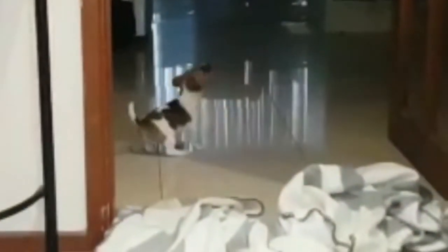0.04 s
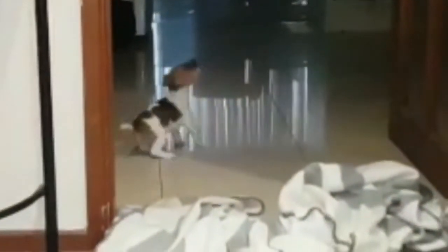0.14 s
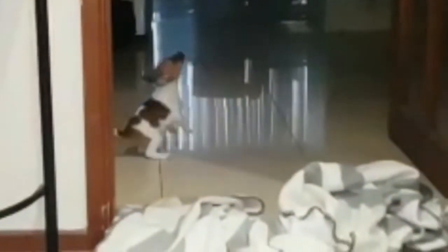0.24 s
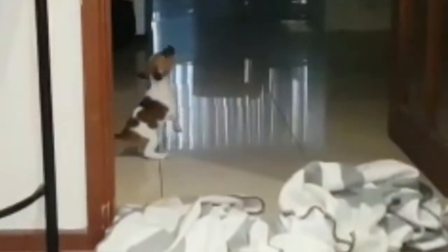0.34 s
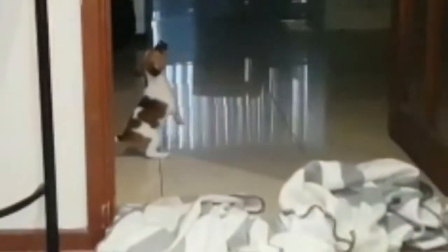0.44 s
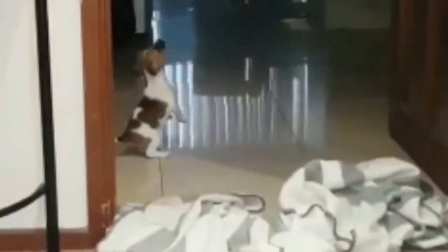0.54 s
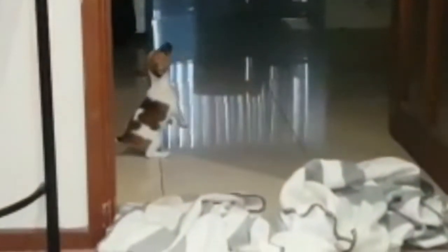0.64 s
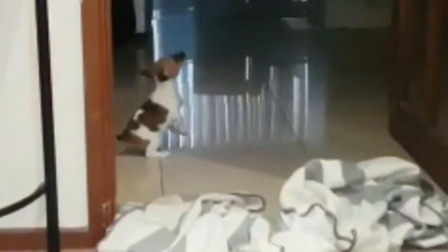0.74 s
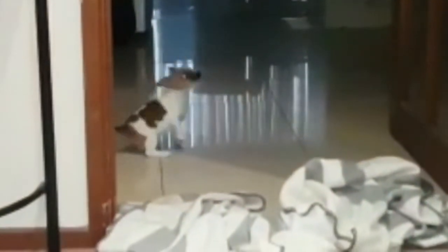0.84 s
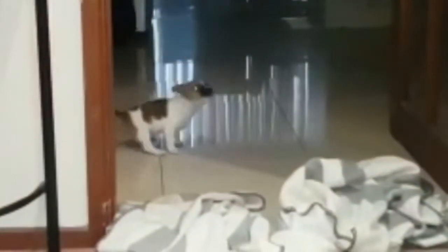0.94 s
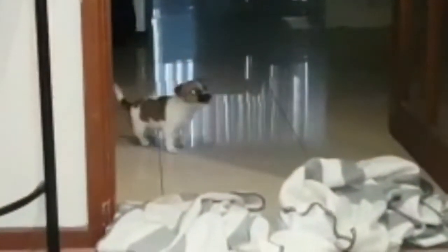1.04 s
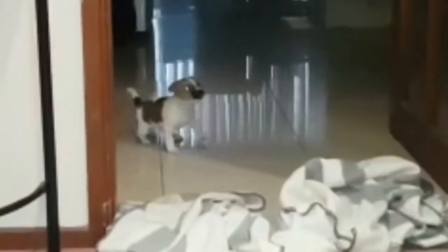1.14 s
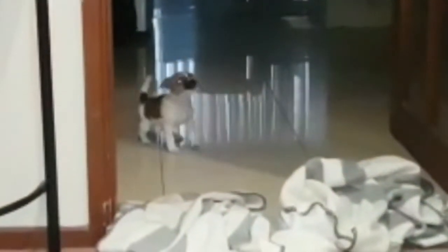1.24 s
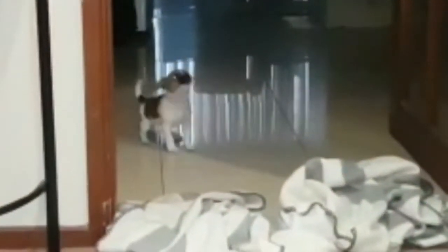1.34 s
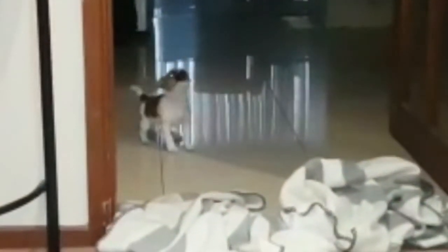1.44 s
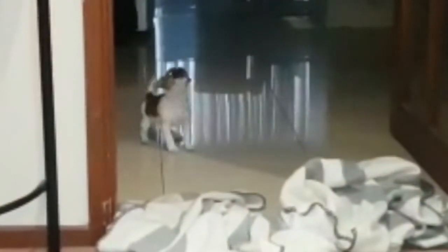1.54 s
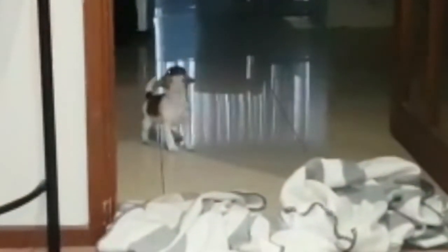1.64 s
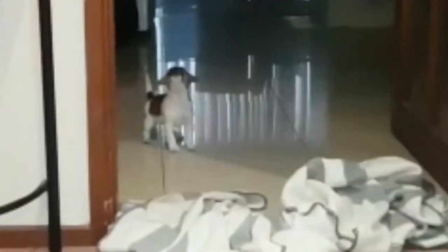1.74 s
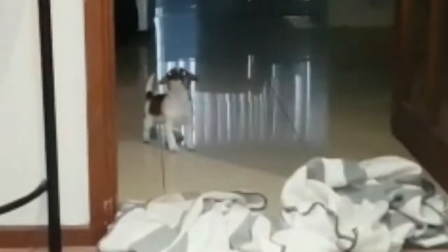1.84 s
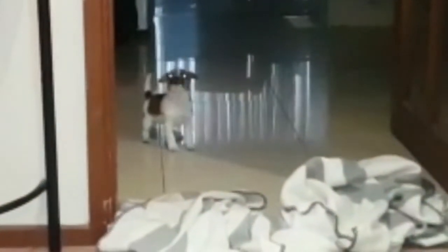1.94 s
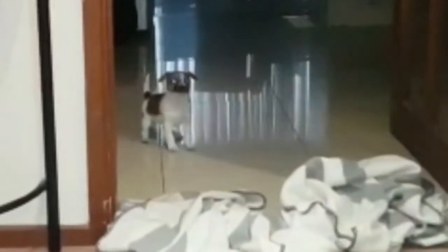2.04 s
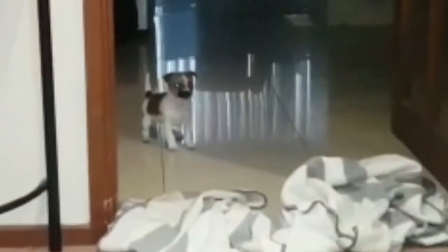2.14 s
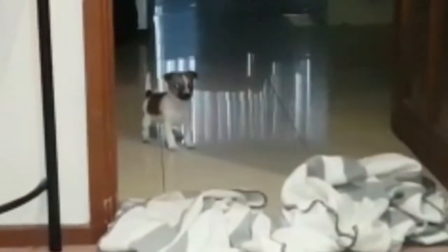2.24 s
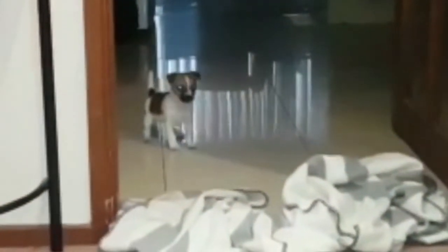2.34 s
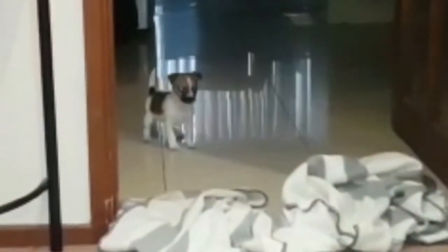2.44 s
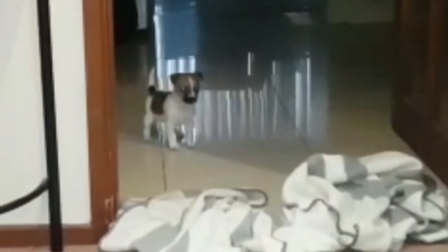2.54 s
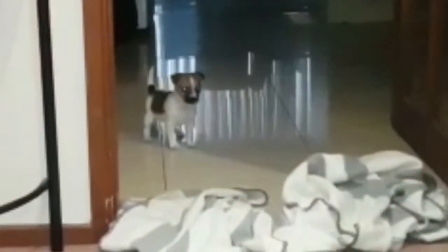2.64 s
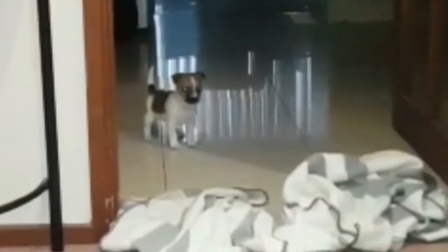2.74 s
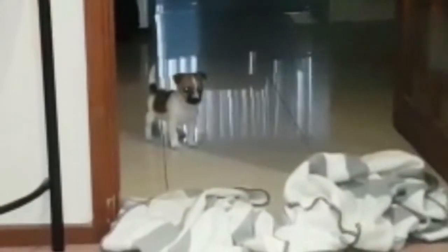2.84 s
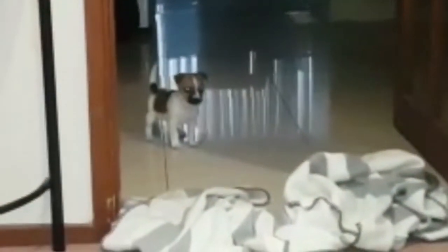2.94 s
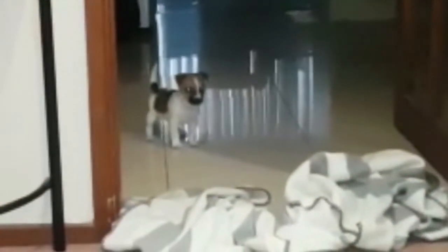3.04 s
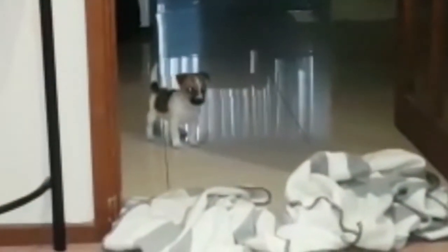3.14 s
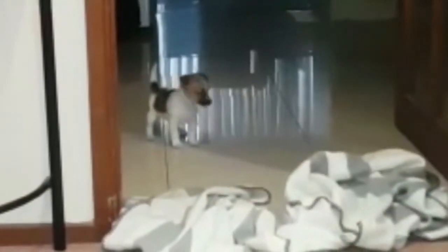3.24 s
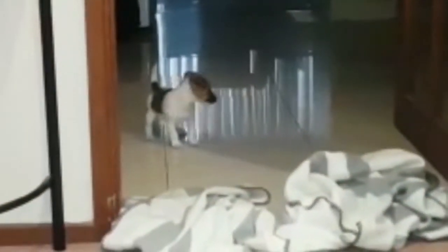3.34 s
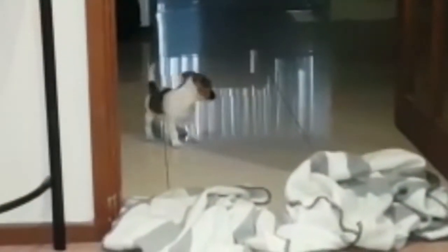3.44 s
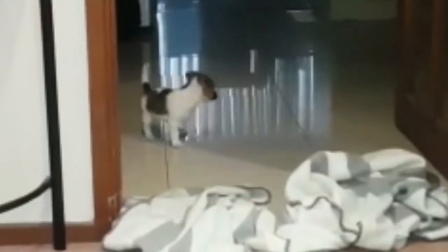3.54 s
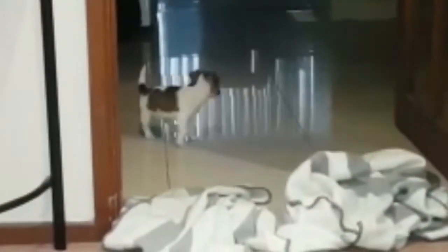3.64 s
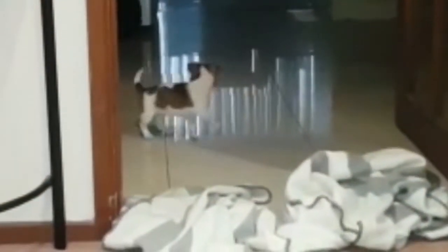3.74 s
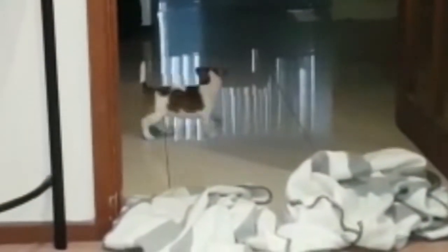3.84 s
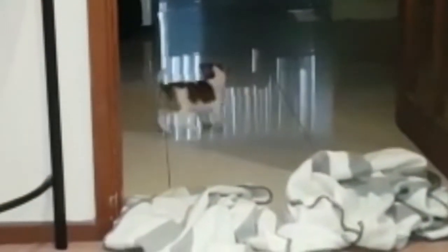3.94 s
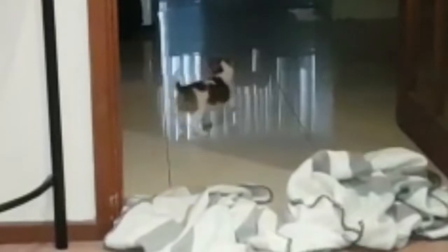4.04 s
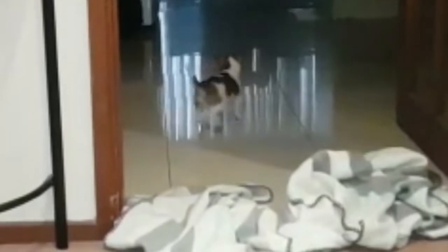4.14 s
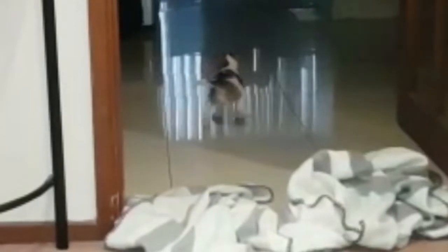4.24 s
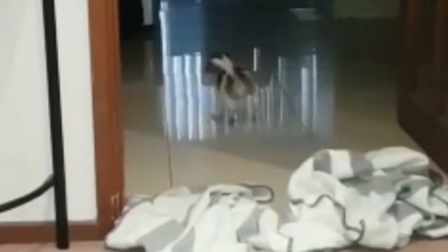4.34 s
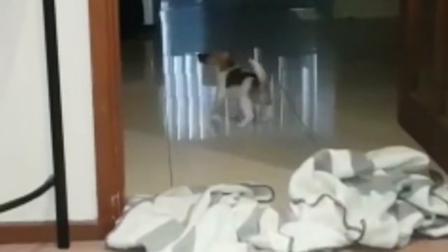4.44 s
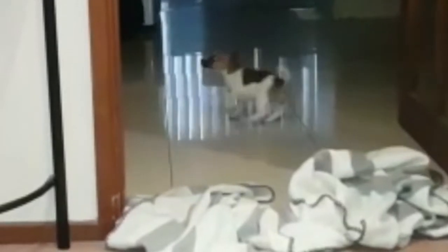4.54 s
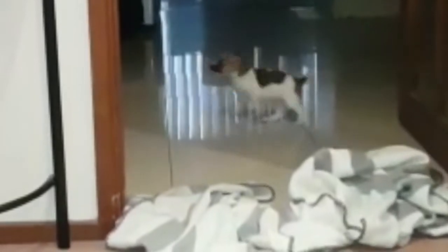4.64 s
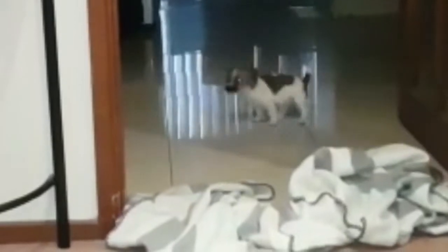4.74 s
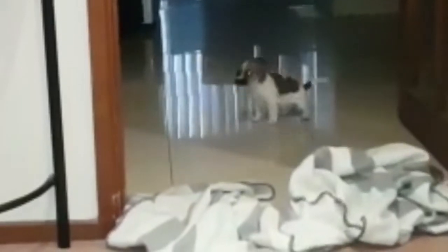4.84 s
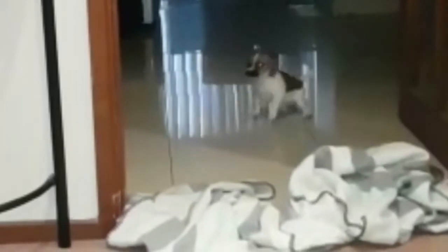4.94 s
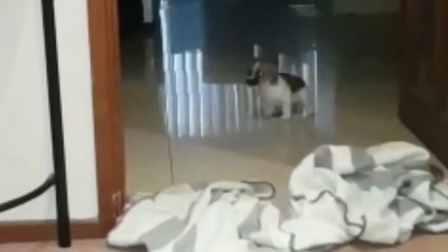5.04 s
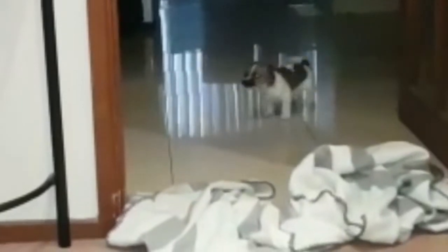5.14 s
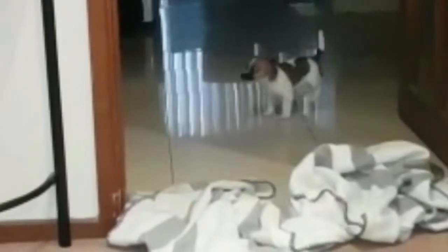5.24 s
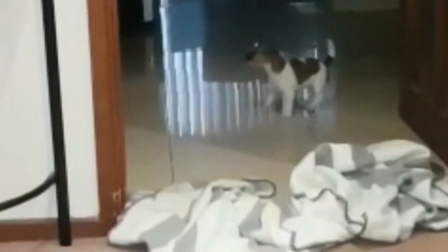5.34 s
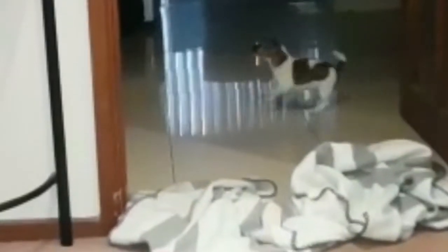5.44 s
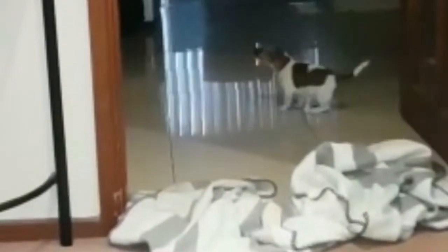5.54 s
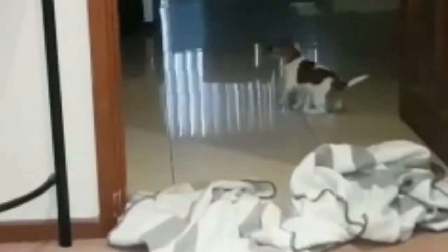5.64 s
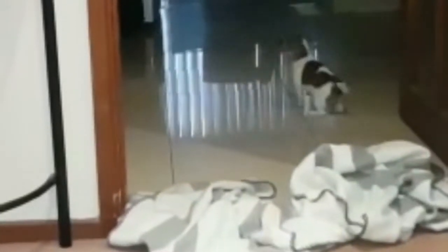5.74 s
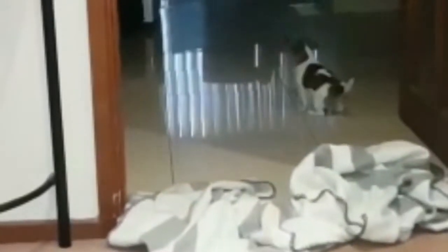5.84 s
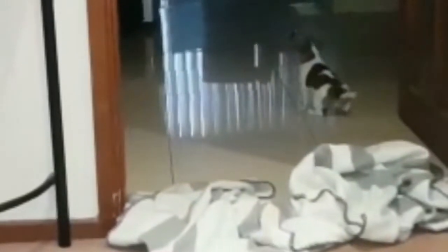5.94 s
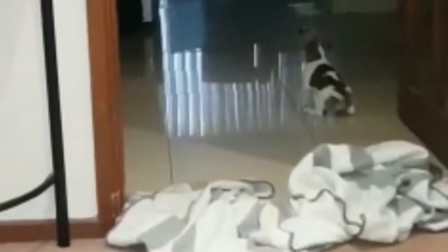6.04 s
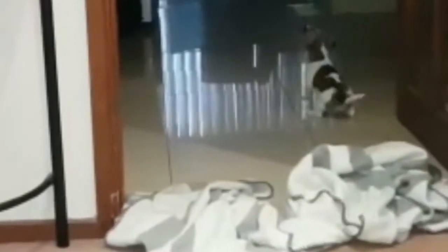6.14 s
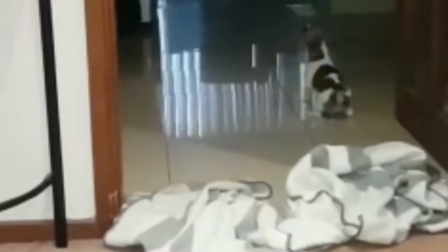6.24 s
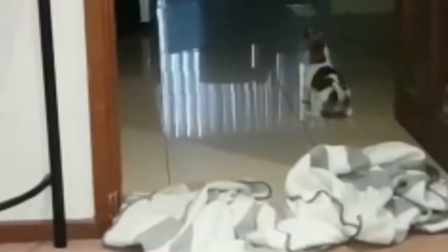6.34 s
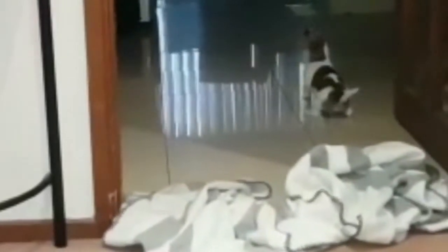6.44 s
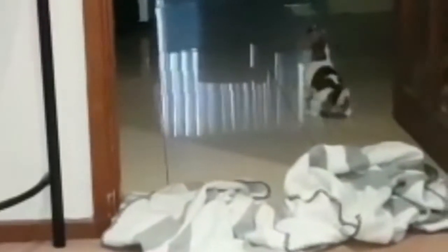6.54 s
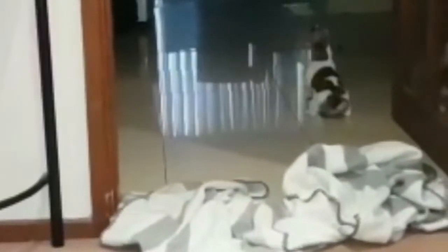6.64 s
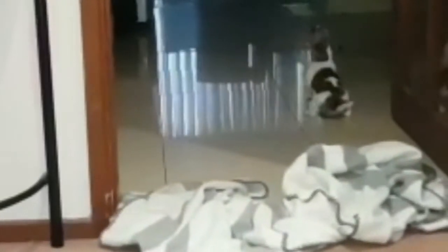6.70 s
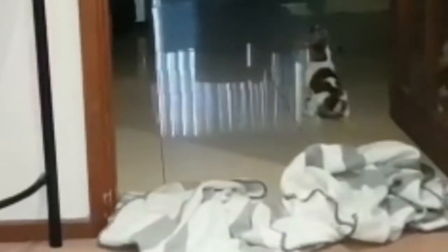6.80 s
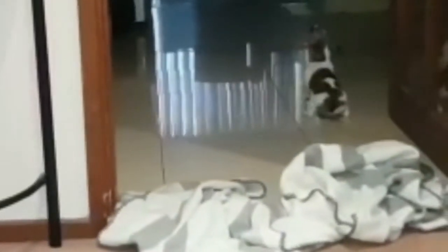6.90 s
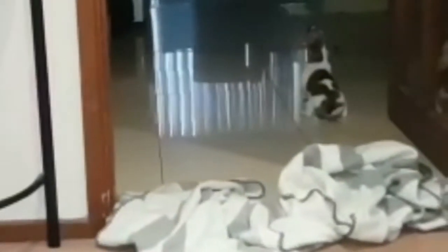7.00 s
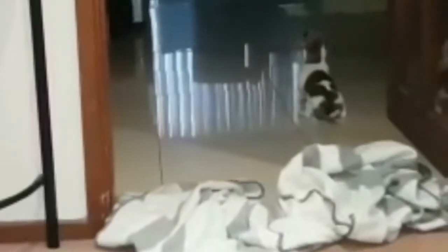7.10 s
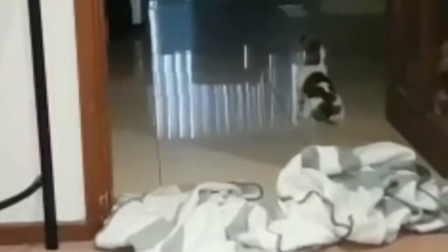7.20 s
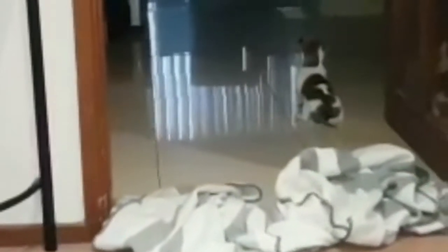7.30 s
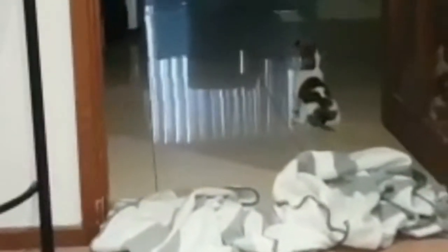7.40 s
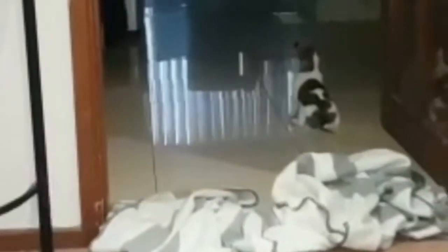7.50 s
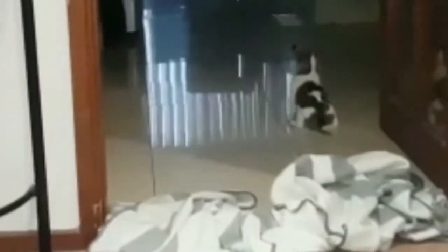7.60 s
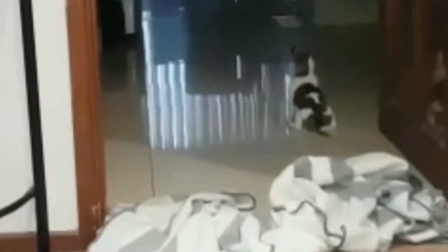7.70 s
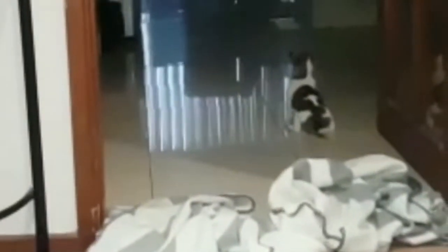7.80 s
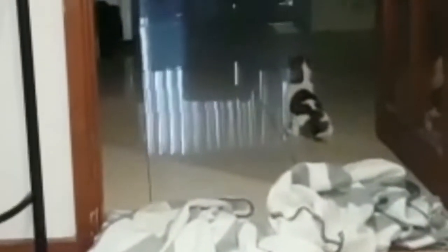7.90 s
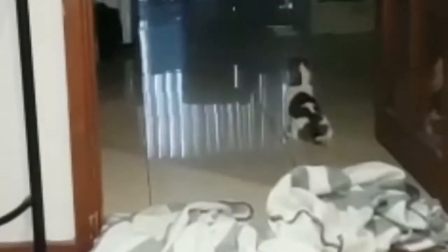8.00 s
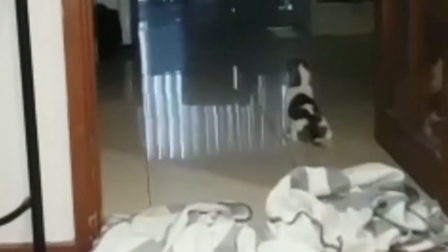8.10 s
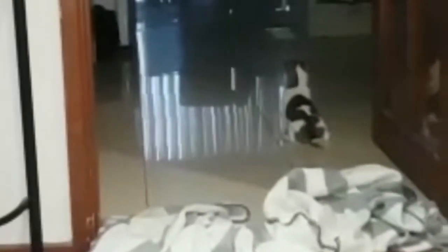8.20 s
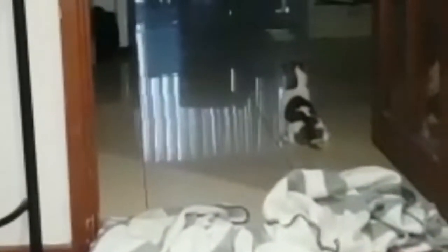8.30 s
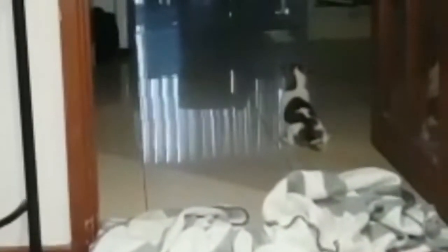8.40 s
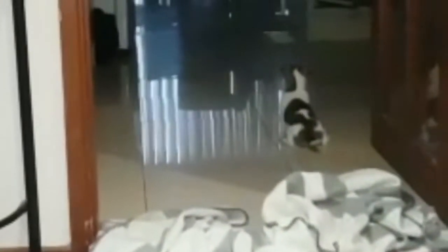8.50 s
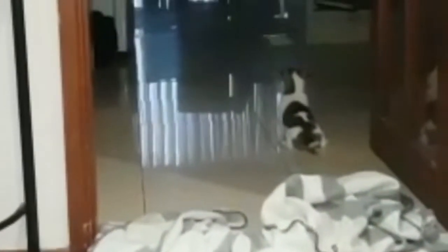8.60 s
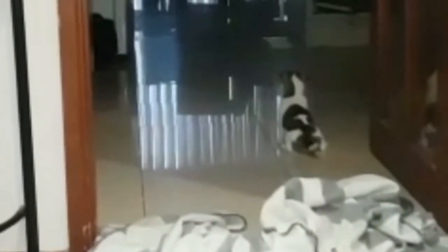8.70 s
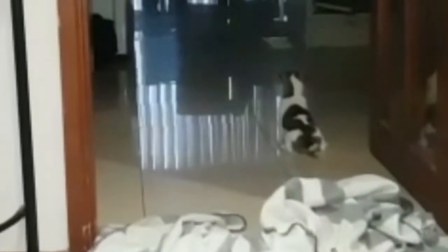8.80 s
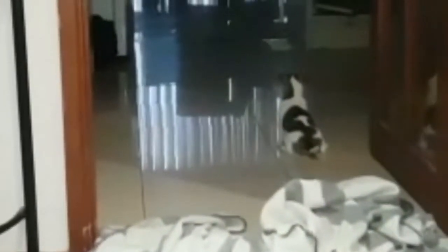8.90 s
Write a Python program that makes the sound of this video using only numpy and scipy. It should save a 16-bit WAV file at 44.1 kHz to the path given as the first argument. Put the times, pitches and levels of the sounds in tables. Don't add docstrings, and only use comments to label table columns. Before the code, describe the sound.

In a hard tiled hallway, a phone a few metres away picks up a small puppy over low unsteady machine hum, faint distant room murmur and microphone hiss. At 0 s a long, piercing, almost pure whine near 1.3 kHz jumps up, then sinks until 0.7, followed by a tiny grunt and low whimper. Soft paw pats near 1.0 lead into a second arched cry until 1.7. A faint level whimper follows at 1.9, then mostly hum until 3.3. A thin rising whimper at 3.4 starts a string of short falling whines from 3.8 to 5.8, with a claw tick at 5.55. At 5.9 a loud cry breaks into rasp, answered at 6.4 to 7.0. Softer wavering and sinking whimpers come at 7.2 and 7.8, with breathy gasps and thin nose whistles, then hum until a high peep at 8.8, cut off at the end.

```python
import sys
import numpy as np
from scipy import signal
from scipy.fft import rfft, irfft, next_fast_len
from scipy.io import wavfile
from scipy.ndimage import map_coordinates

SR = 44100
rng = np.random.default_rng(int(sys.argv[2]) if len(sys.argv) > 2 else 0)


def boost(x):
    u = np.asarray(x, float) / 20
    return 10 ** u


def int16_out(signal):
    q = np.round(np.clip(np.atleast_2d(signal).T, -1, 1) * 32767)
    wavfile.write(sys.argv[1], SR, q.astype(np.int16))


N = 395136
STEP = 16

# t/s, pitch f/Hz, level/dB
LONG_CRIES = [
    [(0.0, 1269, -29.5), (0.056, 1265, -40.5), (0.154, 1295, -17), (0.19, 1478, -14.5),
     (0.242, 1309, -17.5), (0.318, 1293, -10.5), (0.442, 1203, -22), (0.57, 1113, -21), (0.7, 1070, -50.5)],
    [(1.03, 1056, -44.5), (1.062, 1104, -30.5), (1.12, 1034, -31.5), (1.168, 1070, -21), (1.23, 1225, -26),
     (1.3, 1223, -15), (1.508, 1089, -15), (1.6, 1034, -22), (1.7, 1007, -48)],
    [(5.88, 1263, -25), (5.9, 1303, -18), (5.97, 1332, -23), (6.036, 1320, -14.5), (6.094, 1230, -32),
     (6.128, 1279, -17), (6.168, 1193, -21.5), (6.25, 1129, -39.5)],
    [(6.37, 1043, -34.5), (6.422, 1162, -33), (6.528, 1093, -26), (6.552, 1159, -35.5), (6.6, 1341, -18),
     (6.7, 1267, -22.5), (6.846, 1173, -25.5), (6.89, 1114, -23.5), (6.98, 1080, -41.5)],
]
# t/s, pitch f/Hz, level/dB
WHIMPERS = [
    [(0.79, 984.6, -53), (0.804, 953.6, -34.5), (0.846, 1052, -27.5), (0.92, 1041, -38.5), (0.95, 977, -32)],
    [(1.9, 958.2, -61.5), (1.91, 984.7, -39.5), (1.966, 1127, -36.5), (2.08, 1146, -34.5),
     (2.144, 1093, -30.5), (2.18, 1086, -49)],
    [(3.37, 1547, -81), (3.384, 1561, -43), (3.456, 1597, -31.5), (3.53, 1679, -31.5), (3.57, 1719, -32),
     (3.66, 1735, -60)],
    [(7.16, 1151, -47), (7.18, 1080, -34.5), (7.222, 1180, -37), (7.286, 1156, -28.5), (7.378, 1025, -30.5),
     (7.464, 1113, -29), (7.5, 1122, -42.5)],
    [(7.75, 1080, -39.5), (7.796, 1174, -37.5), (7.886, 1075, -30), (7.94, 1005, -49.5), (8.0, 854, -47)],
    [(8.78, 1565, -33), (8.798, 1471, -30.5), (8.88, 1640, -37.5), (8.918, 1486, -19), (8.96, 1480, -25)],
]
# t/s, pitch f/Hz, level/dB
FALLING_WHIMPERS = [
    [(3.8, 1486, -39.5), (3.83, 1591, -38), (3.9, 1518, -27.5), (3.97, 1475, -25), (4.02, 1325, -32.5),
     (4.045, 1179, -55.5)],
    [(4.195, 1622, -41), (4.23, 1584, -28.5), (4.29, 1539, -23), (4.33, 1450, -28), (4.38, 1288, -29.5),
     (4.41, 1178, -40.5)],
    [(4.57, 1750, -56), (4.595, 1881, -33), (4.615, 1620, -32), (4.75, 1340, -27), (4.775, 1182, -34.5),
     (4.8, 991, -47)],
    [(4.935, 1759, -43.5), (4.955, 1612, -28.5), (4.99, 1606, -31), (5.07, 1407, -28), (5.11, 1210, -34.5),
     (5.15, 1117, -33.5), (5.19, 1000, -53.5)],
    [(5.28, 1262, -47), (5.326, 1494, -28), (5.396, 1422, -32), (5.448, 1145, -30.5), (5.538, 1123, -34),
     (5.62, 1108, -100)],
    [(5.67, 1469, -43), (5.738, 1532, -33.5), (5.8, 1231, -36.5), (5.822, 1171, -36.5), (5.875, 1211, -29)],
]
# t/s fully open, stay/s, lift level/dB
MOUTH_OPENINGS = [
    (.44, .3, 19),
    (0.799, .07, 16.5),
    (1.249, .5, 13.5),
    (4.3, .15, -9),
    (6.14, .15, 15),
    (6.86, .2, 16.5),
]
# f/Hz, level/dB
OCTAVE_LEVEL = [(2000, -28), (2300, -22.5), (2600, -24), (2900, -34), (3300, -32.5)]
# f/Hz, level/dB
THROAT_RESPONSE = [(2600, -16), (3300, -22), (3900, -13), (4500, -3), (5050, -4), (5350, -12), (5750, -30),
                   (6300, -38), (7400, -31), (8300, -26), (9500, -30), (11800, -13), (15000, -17)]
# f/Hz, level/dB
OPEN_MOUTH_GAIN = [(3300, -6.5), (3900, -9.5), (4500, -10.5), (5200, -5), (5700, 18.5), (6200, 19.5),
                   (7000, 4.5), (8000, 11), (9500, 5.5), (11500, -3), (14000, -18.5)]
# from t/s, upper partials' level/dB at first, level/dB warm, warm-up/s,
# extra level/dB of the top partials
THROAT_BRIGHTNESS = [(0, -31.5, -2.5, 0.088, -0.5), (.5, -9, -7.5, .1, 4), (0.792, -7, 3, .04, -3),
                     (1.03, -6.5, 0.5, .1, 0.5), (1.899, -24, -5.5, .17, 4), (3.37, 1.5, 3.5, .15, -2.5),
                     (3.8, -11, -5.5, .14, 8.5), (4.19, -10.5, -9, 0.16, 4), (4.57, 3.5, -2, .1, 6.5),
                     (4.93, -1.5, -2, .15, 4.5), (5.28, -6.5, -4, .15, -11), (5.67, -6.5, -6, .1, -1),
                     (5.868, -5, -11, .1, -9.5), (6.37, -5, 0, .1, -13.5), (6.601, -8, -3, .1, -7.5),
                     (7.161, -23.5, -3, .16, -4), (7.751, -25, -16, .1, 0.5), (8.78, -8, 1, .06, -19.5)]
MOUTH_OPENING_S = .17
FULLY_OPEN_DB = 17
UPPER_DB, UPPER_GROWTH = -34.5, 0.54
TOP_FROM_HZ = 7000

# f/Hz, t60/s
HALL_DECAY = [(300, 0.2), (1200, 0.42), (2500, 0.4), (5000, 0.34), (12000, 0.3)]
# t/s, direct level/dB, hall level/dB
DIRECT_AND_HALL = [(0, 0.5, 2), (.2, 0.5, 0.5), (.29, 2, -5), (.45, -2.5, 0), (2.3, 4.5, -4.5), (3.3, -3, -5),
                   (5, 2, 1.5), (6, 4, 7.5), (8.96, -3.5, -10.5)]
# f/Hz, left minus right level/dB
PORT_COLOUR = [(500, -4), (1000, 0), (2300, -7.5), (4500, -5), (9000, 2.5)]
# f/Hz, left lead/rad
PORT_PHASE = [(0, -2.5), (2580, 0.5), (8870, 10), (9820, 22.5), (12100, 7.5), (15200, 18.5)]
# t/s, left minus right level/dB
PORT_BALANCE = [(0, 1), (.7, 0.5), (1.2, -2), (1.7, 2), (2.1, -0.5), (3.5, -2), (4.2, 1.5), (4.8, 1.5),
                (5.3, 0), (5.8, 1.5), (6.2, 1.5), (6.8, 1), (7.3, 0), (7.9, 2.5), (8.9, -2.5)]
PORT_DRIFT_S = .00004

# f/Hz, density level/dB per Hz
HUM_SPECTRUM = [(12, -53), (20, -29), (43, -5), (95, -2.5), (110, -6.5), (129, -11.5), (177, -12),
                (195, -19.5), (273, -21.5), (375, -29.5), (499, -29), (585, -32.5), (900, -41.5),
                (1170, -73.5), (1980, -120)]
# f/Hz, level/dB
MACHINE_TONES = [
    (99, -56),
    (169, -59),
]
# f/Hz, coherence/1
BACKGROUND_COHERENCE = [(60, .98), (180, .91), (550, .7), (1650, .4), (5000, 0)]
# f/Hz, density level/dB per Hz
FAR_ROOM_SPECTRUM = [(250, -18), (450, -11), (900, -9), (1600, -10), (2200, -8), (3200, -17.5), (5000, -25)]
# f/Hz, density level/dB per Hz
HISS_SPECTRUM = [(400, -30), (800, -2), (1500, -5.5), (2000, -1), (3200, -7), (5000, -7), (6500, -10),
                 (8000, -9), (10000, -7), (13000, -6), (15700, -6)]
HUM_DB, HISS_DB = -43, -58.7
FAR_ROOM_DB, FAR_ROOM_FOLLOWS = -59, .55
FAR_ROOM_MEMORY_S, VOICE_SILENCE_DB = .15, -56

# t/s at full strength, rise/s, hold/s, level/dB, flap rate f/Hz
RASPS = [
    (.001, .001, .01, -41, 181),
    (.19, .03, .02, -40, 180),
    (5.955, .035, .15, -21, 179),
    (6.605, .015, .045, -31, 178),
]
# f/Hz, width f/Hz, level/dB
MOUTH_MODES = [(704, 120, -6.5), (1080, 330, 6), (1320, 1046, 4), (1852, 404, 2), (2506, 220, -0.5)]
# f/Hz, width f/Hz, level/dB
FRONT_MOUTH_MODES = [(3500, 500, -35), (4200, 700, -31), (5250, 500, -30), (6000, 400, -35),
                     (9300, 2500, -46)]
# t/s at full strength, rise/s, hold/s, level/dB, flap rate f/Hz
GRUNTS = [
    (.001, 0.0011, 0.0072, -33, 215.1),
    (.74, 0.044, 0.0035, -35.5, 225.2),
    (6.28, 0.035, 0.01, -34, 233.6),
]
# f/Hz, width f/Hz, level/dB
CHEST_MODES = [(227, 160, -0.5), (675, 110, 2), (1225, 2000, -6.5)]
# level/dB, unevenness/1
FLAP_UNEVENNESS = [(-38, .35), (-31, .22), (-25.5, .08), (-21, .025)]
# rate/(dB/s), loss level/dB at the end
RASP_FADE = (230, 26)
GRUNT_FADE = (450, 44)
BURST_RISE_DB, SLACKENING = 13.5, 0.93

# t/s, length/s, centre f/Hz, width f/Hz, level/dB
GASPS = [
    (.07, 0.089, 2420, 50, -46),
    (3.704, 0.058, 2320, 355, -53.5),
    (3.99, 0.051, 2470, 320, -51.5),
    (4.468, 0.07, 2890, 150, -55),
    (7.416, 0.38, 1790, 380, -56),
    (8.056, 0.061, 2730, 149, -56),
]
# t/s, level/dB
CRESTS = [(.16, 0), (0.194, -0.5), (.236, 6), (0.282, 0.5), (.312, 5), (0.329, -4), (0.348, 3.5),
          (.372, -2), (0.397, 0.5), (.58, 1), (1.337, -2.5), (1.375, 4.5), (1.397, 1), (1.441, -0.5),
          (1.467, 3), (1.51, 0), (1.541, -4.5), (1.575, 3.5), (4.691, -0.5), (4.752, 1), (5.063, 1.5),
          (5.889, 0), (5.93, -3), (5.974, 2.5), (6.004, 1.5), (6.72, -1)]
# t/s, level/dB
BRIEF_DIPS = [(.086, -4), (0.172, -9), (.219, -17.5), (0.23, -9), (0.242, -11.5), (1.941, -14), (3.438, -10),
              (4.592, -6), (4.664, -10), (4.948, -5.5), (5.698, -2), (5.76, -4), (5.881, -4), (6.592, -9),
              (6.687, -5), (6.855, -7), (6.878, -1.5), (6.898, -4.5), (8.899, -7.5), (8.931, -7)]
CREST_S, BRIEF_DIP_S = .014, 0.0032
# start t/s, length/s, level/dB
AIR_LEAKS = [(3.54, .1, -63), (3.93, .08, -58.5), (4.22, .25, -65), (4.6, .19, -58.5), (4.97, .17, -61),
             (5.3, .3, -69), (5.97, .25, -68), (6.38, .15, -67), (6.6, .2, -72), (.83, .08, -66),
             (7.3, .25, -71)]
# f/Hz, density level/dB per Hz
AIR_SPECTRUM = [(1200, -40), (2500, -12), (3300, -8), (4700, -2), (5800, -9), (7200, -10), (8600, -3),
                (12000, -5), (15500, -14)]
AIR_RISE_S, AIR_FALL_S, AIR_EDGE_DB = .03, .1, 18
# t/s, peak level/dB, floor ring f/Hz
PAWS = [
    (0.976, -39.5, 345),
    (1, -42, 251.3),
    (6.379, -64.5, 300),
]
# t/s, peak level/dB, left minus right level/dB
CLAWS = [
    (3.3435, -63.5, 24.5),
    (5.5633, -35, -11),
    (7.081, -45, 0),
]
# start t/s, length/s, first f/Hz, last f/Hz, level/dB
SQUEAKS = [
    (1.3, .09, 7500, 8250, -72),
    (1.43, .13, 8600, 7900, -72),
    (3.72, .36, 6300, 6900, -80),
    (5.83, 0.13, 9780, 9650, -83),
    (5.97, 0.13, 9800, 10300, -80),
    (6.34, 0.055, 8630, 8760, -78),
]
# start t/s, length/s, first f/Hz, last f/Hz, level/dB
WHISTLES = [(3.33, 0.098, 8680, 8570, -63.5), (3.795, 0.075, 8800, 8900, -69.5),
            (4.195, .13, 9110, 9440, -73), (4.56, 0.063, 9240, 9030, -67), (4.925, 0.057, 8850, 9530, -75),
            (5.28, .05, 9170, 8700, -73.5), (5.49, 0.12, 8200, 8730, -82), (5.665, .04, 9290, 8960, -78),
            (7.15, 0.052, 9000, 9480, -77), (7.36, .09, 8280, 8300, -80), (7.5, .07, 8450, 8430, -77),
            (7.735, 0.092, 8600, 8620, -69), (8.0, .11, 8500, 8700, -68), (8.765, 0.084, 8800, 8800, -66.5)]
WHISTLE_HOLD, WHISTLE_FADE_DB = 0.6, 13


def unit(x):
    return x / np.sqrt(np.mean(x ** 2) + 1e-20)


def along(points, hz):
    f, v = np.transpose(points)
    return np.interp(np.log(hz + 1), np.log(f + 1), v)


def slow_time():
    return np.arange(0, N, STEP) / SR


def fine(slow):
    return np.interp(np.arange(N), np.arange(0, N, STEP), slow)


def curves(calls, fade=0.011):
    t = slow_time()
    s, *columns = np.transpose(np.concatenate(calls))
    gate = 0
    for call in calls:
        inside = np.minimum(t - call[0][0], call[-1][0] - t)
        gate = gate + np.clip(inside / fade + .5, 0, 1)
    return [np.interp(np.arange(N) / SR, s, c) for c in columns] + [fine(gate ** 2)]


def wobble(rate, slow=False):
    knots = rng.standard_normal(int(N * rate / SR) + 4)
    places = np.arange(0, N, STEP) * rate / SR
    curve = 1.4 * map_coordinates(knots, [places], order=2, prefilter=False)
    return curve if slow else fine(curve)


def filtered(x, response):
    m = next_fast_len(N + SR // 2)
    return irfft(rfft(x, m) * response(np.fft.rfftfreq(m, 1 / SR)), m)[..., :N]


def noise(spectrum, coherence):
    def mid_side(hz):
        angle = np.arccos(np.clip(along(coherence, hz), -1, 1)) / 2
        return boost(along(spectrum, hz)) * [np.cos(angle), np.sin(angle)]

    mid, side = filtered(rng.standard_normal((2, N)), mid_side)
    return unit(np.array([mid + side, mid - side]))


def bursts(rows, fade):
    db_per_s, lost_db = fade
    return [[(s - rise, db - BURST_RISE_DB, hz),
             (s, db, hz),
             (s + hold, db, hz),
             (s + hold + lost_db / db_per_s, db - lost_db, SLACKENING * hz)]
            for s, rise, hold, db, hz in rows]


def cries(jitter=.004, shimmer_db=1.5, hoarse=.015, ragged=.22, fall_db=3):
    pitch, first_db, gate = curves(sorted(LONG_CRIES + WHIMPERS + FALLING_WHIMPERS), fade=0.005)
    t, slow_hz = slow_time(), pitch[::STEP]
    gape_db = sum(db * np.clip(1 + (t - s) / MOUTH_OPENING_S, 0, 1) * (t < s + stay)
                  for s, stay, db in MOUTH_OPENINGS)
    openness = np.clip(gape_db / FULLY_OPEN_DB, 0, 1)
    settings = np.transpose(THROAT_BRIGHTNESS)
    current = np.searchsorted(settings[0], t, side='right') - 1
    since, cold_db, warm_db, warm_s, top_db = settings[:, current]
    bright_db = cold_db + (warm_db - cold_db) * np.clip((t - since) / warm_s, 0, 1)
    second_db = first_db + fine(along(OCTAVE_LEVEL, 2 * slow_hz) + gape_db)
    upper_db = UPPER_DB + UPPER_GROWTH * (first_db + 21.5) + fine(bright_db)
    phase = 2 * np.pi * np.cumsum(pitch * (1 + jitter * wobble(120))) / SR

    upper = 0
    for k in range(3, 12):
        hz = k * slow_hz
        level_db = along(THROAT_RESPONSE, hz) + openness * along(OPEN_MOUTH_GAIN, hz)
        level_db = level_db + top_db * (hz > TOP_FROM_HZ) - fall_db * max(k - 5, 0)
        level_db = level_db + 3.5 * wobble(18, slow=True)
        upper = upper + fine(boost(level_db) * (hz < 15500)) * np.sin(k * phase + k * k)

    rasp_db, _, rasping = curves(bursts(RASPS, RASP_FADE), fade=0.021)
    rasping = rasping * np.clip((rasp_db + 52) / 22, 0, 1)
    upper = upper * (1 - .7 * rasping + (ragged + 1.3 * rasping) * wobble(700))
    tone = boost(first_db + 4) * np.sin(phase) + boost(second_db + 6.0) * np.cos(2 * phase)
    tone = tone * (1 - .6 * rasping ** 3 + (hoarse + .15 * rasping ** 3) * wobble(900))
    return gate * boost(shimmer_db * wobble(60)) * (tone + boost(upper_db + 2.0) * upper)


def hall(x):
    hz, _, z = signal.stft(rng.standard_normal((2, SR)), SR, nperseg=256)
    t = signal.stft(np.zeros(SR), SR, nperseg=256)[1]
    decay = boost(-60 * t / along(HALL_DECAY, hz)[:, None])
    tail = signal.istft(z * decay, SR, nperseg=256)[1]
    tail = tail + .1 * tail[::-1]
    delayed = np.pad(x, (250, 0))[None]
    return signal.fftconvolve(delayed, tail / np.linalg.norm(tail[0]), axes=1)[:, :N]


def spaced_ports(x):
    def port(hz):
        return boost(along(PORT_COLOUR, hz) / 2) * np.exp(.5j * along(PORT_PHASE, hz))

    return filtered(x, lambda hz: [port(hz), 1 / port(hz)])


def shifting_balance(x):
    pan_db, lag = curves([PORT_BALANCE])[0], PORT_DRIFT_S * SR * wobble(1.5)
    return np.array([boost(way * pan_db / 2) * map_coordinates(side, [np.arange(N) + way * lag / 2])
                     for side, way in zip(x, (1, -1))])


def machine_hum():
    rumble = boost(HUM_DB + 0.79 * wobble(2.9)) * noise(HUM_SPECTRUM, BACKGROUND_COHERENCE)
    tones = 0
    for hz, db in MACHINE_TONES:
        level = boost(db + 3 * wobble(11))
        phase = 2 * np.pi * np.cumsum(hz * (1 + 0.038 * wobble(4.9))) / SR
        tones = tones + level * np.sin(phase)
    return rumble + tones


def far_rooms(voice):
    power = np.abs(filtered(voice ** 2, lambda hz: 1 / (1 + 2j * np.pi * hz * FAR_ROOM_MEMORY_S)))
    voice_db = 10 * np.log10(power + boost(2 * VOICE_SILENCE_DB))
    level_db = FAR_ROOM_DB + FAR_ROOM_FOLLOWS * (voice_db + 22) + 2.5 * wobble(24)
    return boost(level_db) * noise(FAR_ROOM_SPECTRUM, BACKGROUND_COHERENCE)


def microphone_hiss():
    return boost(HISS_DB) * noise(HISS_SPECTRUM, BACKGROUND_COHERENCE)


def flaps(calls, modes, top=(), low_hz=100):
    level_db, rate_hz, gate = curves(calls)
    uneven = np.interp(level_db, *np.transpose(FLAP_UNEVENNESS))
    cycles = np.cumsum(rate_hz * np.exp(.7 * uneven * wobble(150))) / SR
    puffs = np.diff(np.floor(cycles), prepend=0) * boost(8 * uneven * rng.standard_normal(N))
    puffs = puffs + .1 * uneven * rng.standard_normal(N)

    def resonances(f, peaks):
        return sum((-1) ** k * boost(db) * 1j * f * w / (c * c - f * f + 1j * f * w)
                   for k, (c, w, db) in enumerate(peaks))

    def tract(f):
        band = 1 / (1 + (f / 2600) ** 30) / (1 + (low_hz / (f + 1)) ** 12)
        front = resonances(f, top) * (f > 2700) / (1 + (f / 11500) ** 16)
        return resonances(f, modes) ** 2 * band + front

    return gate * boost(level_db) * unit(filtered(puffs, tract))


def rasps():
    return flaps(bursts(RASPS, RASP_FADE), MOUTH_MODES, FRONT_MOUTH_MODES, low_hz=620)


def grunts():
    return flaps(bursts(GRUNTS, GRUNT_FADE), CHEST_MODES)


def gasps():
    t, out = np.arange(N) / SR, 0
    for s, long, hz, wide_hz, db in GASPS:
        band = unit(filtered(rng.standard_normal(N), lambda f: np.exp(-.5 * ((f - hz) / wide_hz) ** 2)))
        out = out + boost(db) * np.exp(-.5 * ((t - s) / long) ** 2) * band
    return out


def swells_and_dips(x):
    t = slow_time()
    gain_db = 0
    for events, width_s in ((CRESTS, CREST_S), (BRIEF_DIPS, BRIEF_DIP_S)):
        gain_db = gain_db + sum(db * np.exp(-.5 * ((t - s) / width_s) ** 2) for s, db in events)
    return x * fine(boost(gain_db))


def air():
    t, leak = slow_time(), 0
    for s, long, db in AIR_LEAKS:
        outside = np.maximum((s - t) / AIR_RISE_S, (t - s - long) / AIR_FALL_S)
        leak = leak + boost(db - AIR_EDGE_DB * np.maximum(outside, 0))
    return fine(leak) * boost(4 + 3 * wobble(30)) * noise(AIR_SPECTRUM, [(1000, 0.92)])[0]


def steps():
    out, t = np.zeros((2, N + SR)), np.arange(SR // 8) / SR
    for s, db, hz in PAWS:
        envelope = boost(db - 60 * t / 0.052) * (1 - np.exp(-t / 0.0019))
        out[:, round(s * SR):][:, :len(t)] += envelope * np.sin(2 * np.pi * hz * t)
    for s, db, pan_db in CLAWS:
        tick = rng.standard_normal(len(t)) * boost(db - 2.5 - 60 * t / 0.005)
        out[:, round(s * SR):][:, :len(t)] += tick * boost([[pan_db / 2], [-pan_db / 2]])
    return out[:, :N]


def nose_whistle(rows, jitter=0.009):
    calls = [[(s, a_hz, db),
              (s + WHISTLE_HOLD * long, b_hz, db),
              (s + long, b_hz, db - WHISTLE_FADE_DB)]
             for s, long, a_hz, b_hz, db in rows]
    pitch, level_db, gate = curves(calls)
    phase = 2 * np.pi * np.cumsum(pitch * (1 + jitter * wobble(96))) / SR
    return gate * boost(level_db + 17.5 + 4.3 * wobble(50)) * np.sin(phase)


def scene():
    voice = cries() + rasps() + grunts() + gasps() + air()
    voice = voice + nose_whistle(SQUEAKS) + nose_whistle(WHISTLES)
    feet = steps()
    dull_feet = filtered(feet.mean(0), lambda hz: 1 / (1 + (hz / 1500) ** 4))
    direct_db, hall_db = curves([DIRECT_AND_HALL])[:2]
    puppy = boost(direct_db) * voice + hall(boost(hall_db) * voice + 5.1 * dull_feet)
    puppy = shifting_balance(swells_and_dips(spaced_ports(puppy)))
    return puppy + feet + machine_hum() + far_rooms(voice) + microphone_hiss()


def band_limit(x):
    return signal.sosfilt(signal.butter(12, 15660, fs=SR, output="sos"), x)


def record(dry):
    clipped = dry / (1 + np.abs(dry) ** 80) ** (1 / 80)
    limited = filtered(clipped, lambda hz: hz < 15700)
    return band_limit(limited)


dry = scene()
out = record(dry)
int16_out(out)
```